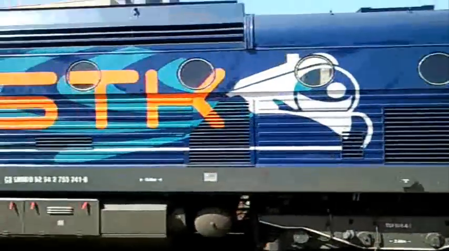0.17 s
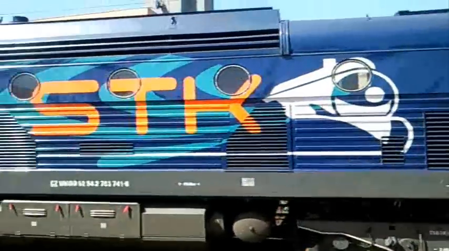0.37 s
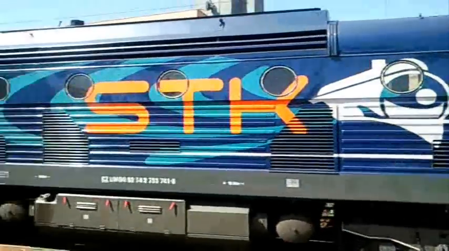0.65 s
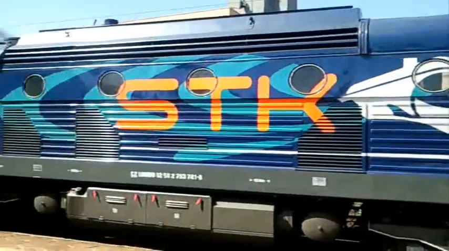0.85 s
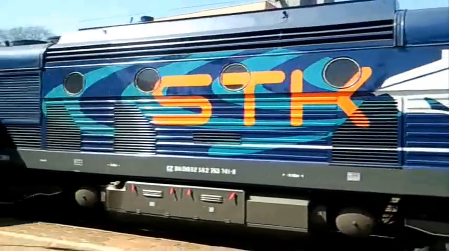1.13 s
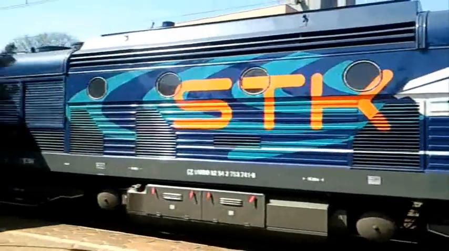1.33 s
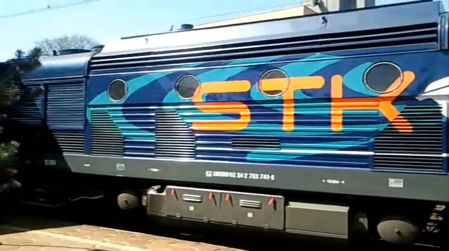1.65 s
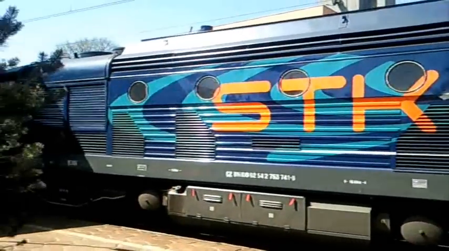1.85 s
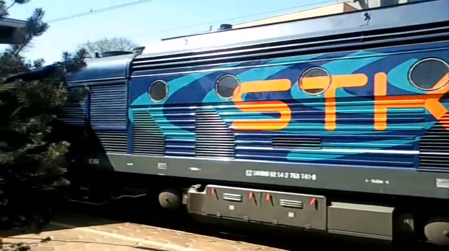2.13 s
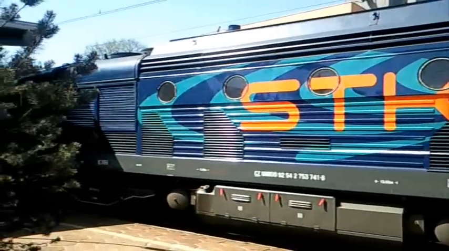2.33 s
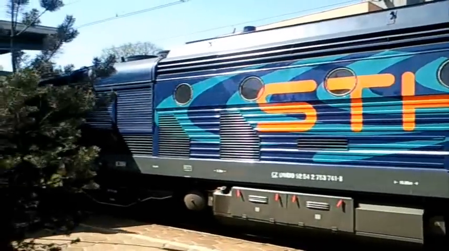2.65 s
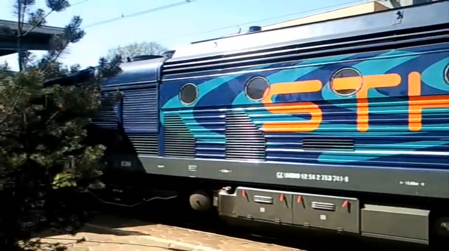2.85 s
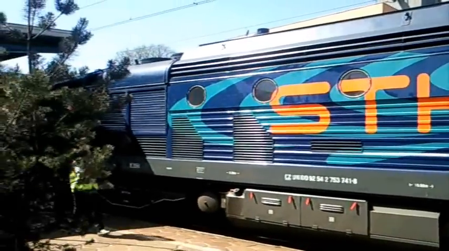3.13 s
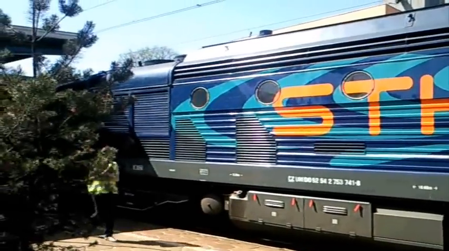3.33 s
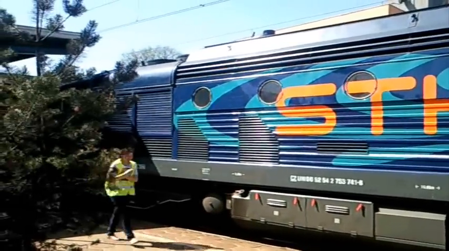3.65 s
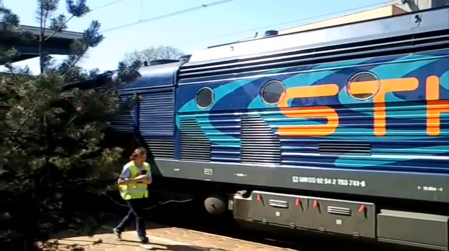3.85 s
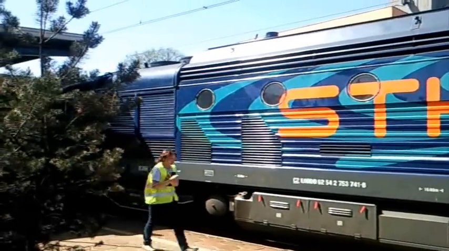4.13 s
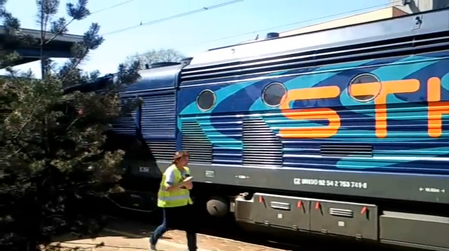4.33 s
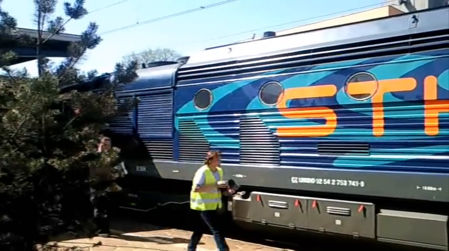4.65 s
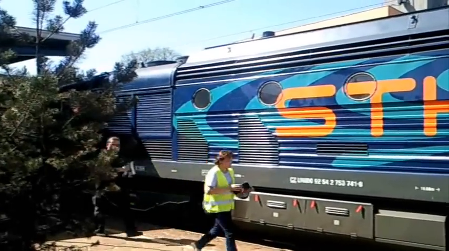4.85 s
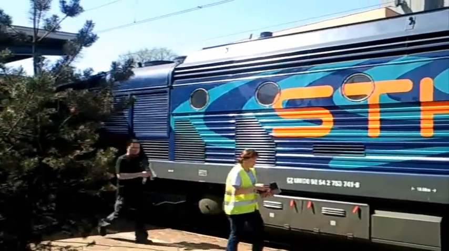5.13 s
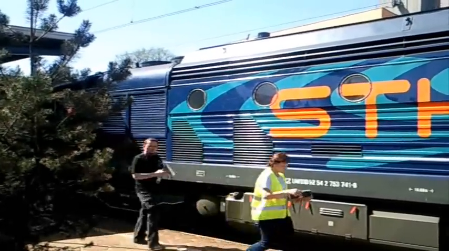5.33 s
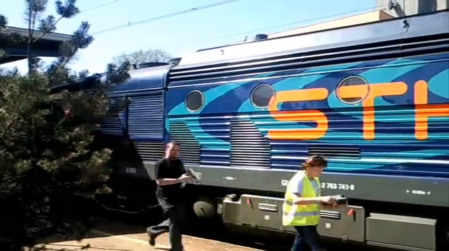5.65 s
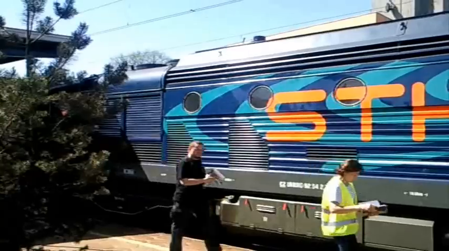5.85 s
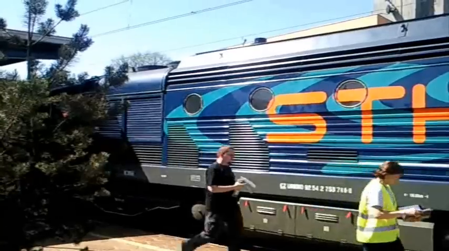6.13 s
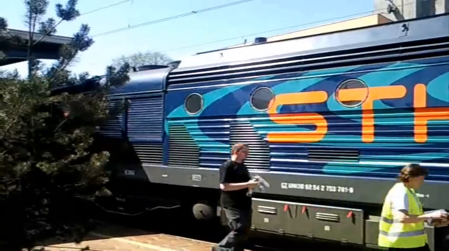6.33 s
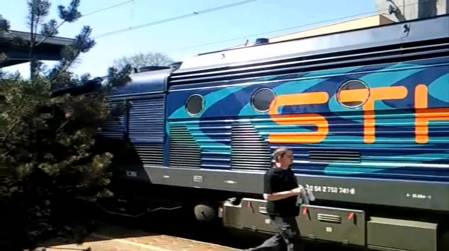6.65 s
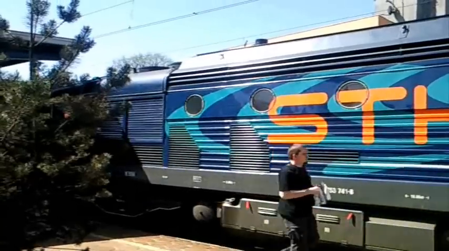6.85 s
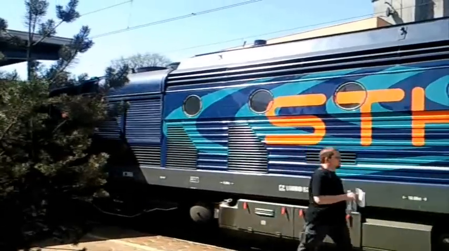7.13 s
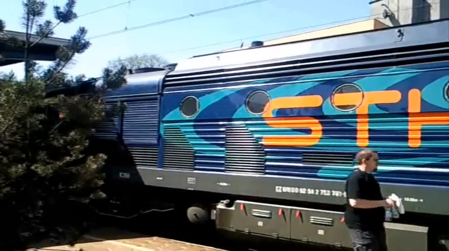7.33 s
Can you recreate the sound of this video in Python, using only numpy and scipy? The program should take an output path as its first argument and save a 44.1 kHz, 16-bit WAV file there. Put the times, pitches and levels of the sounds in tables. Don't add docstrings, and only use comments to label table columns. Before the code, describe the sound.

A small unprotected microphone on an open platform catches violent wind rumble and snapping thumps over a locomotive's constant ventilation roar. An early brake shoe squeaks faintly, then longer. After about three seconds the gusts thin out, revealing the pulsing hum and whine. Around the middle there are a soft chirp, a quick air hiss and a brighter chirp; a few light gusts return at the end.

```python
import sys
import numpy as np
from scipy import signal
from scipy.fft import rfft, irfft
from scipy.io import wavfile
from scipy.ndimage import uniform_filter1d, minimum_filter1d

SR = 44100
rng = np.random.default_rng(int(sys.argv[2]) if len(sys.argv) > 2 else 0)


def wav_record(signal):
    frames = np.transpose(np.atleast_2d(signal))
    bounded = np.clip(frames, -1, 1)
    quanta = np.round(bounded * 32767).astype(np.int16)
    wavfile.write(sys.argv[1], SR, quanta)


N = 329868


def from_db(db):
    return 10 ** (np.asarray(db) / 20)


def rms_one(x):
    return x / np.sqrt(np.mean(x ** 2) + 1e-20)


def in_time(rows):
    s, db = np.transpose(rows)
    return np.interp(np.arange(N) / SR, s, db)


def drift(rate):
    r = np.exp(-40 * np.pi * rate / SR)
    noise = rng.standard_normal(N // 20 + 4002)
    slow = signal.lfilter([1], [1, -2 * r, r * r], noise)[4000:]
    return np.interp(np.arange(N) / 20, np.arange(len(slow)), rms_one(slow - slow.mean()))


def coloured(spectrum):
    hz, db = np.transpose(spectrum)
    log_hz = np.log(np.fft.rfftfreq(N, 1 / SR) + 1)
    corners = np.log(np.r_[hz[0] / 3, hz, hz[-1] * 1.1])
    shape = np.interp(log_hz, corners, np.r_[db[0] - 20, db, db[-1] - 40])
    return rms_one(irfft(rfft(rng.standard_normal(N)) * from_db(shape), N))


def band(x, low_hz, high_hz):
    return signal.sosfilt(signal.butter(2, [low_hz, high_hz], "band", fs=SR, output="sos"), x)


def whistle(hz, width_hz):
    r = np.exp(-np.pi * width_hz / SR)
    poles = [1, -2 * r * np.cos(2 * np.pi * hz / SR), r * r]
    tone = signal.lfilter([1, 0, -1], poles, rng.standard_normal(N + SR))
    return rms_one(tone[SR:])


def sine(hz, wander_hz):
    return np.sqrt(2) * np.sin(2 * np.pi * np.cumsum(hz + wander_hz * drift(1.6)) / SR)


def swell_of(start, length, late, power):
    done = np.clip((np.arange(N) / SR - start) / length, 0, 1)
    return np.abs(np.sin(np.pi * done ** late)) ** power


# frequency in Hz, density in dB per Hz.
ROAR_SPECTRUM = [(30, -13), (90, -8.5), (170, -13.5), (340, -11), (500, -11.5), (655, -18), (900, -15.5),
                 (1080, -19), (1500, -18), (2550, -15), (3000, -26), (5200, -28), (6800, -33), (8000, -28)]
# time in seconds, level in dB.
ROAR_LEVEL = [(0.0, -25.5), (0.69, -26), (1.39, -27.5), (1.77, -26.5), (3.35, -27.5), (3.75, -27),
              (4.3, -29), (7.19, -27.5), (7.48, -26.5)]
# pitch in Hz, width in Hz, level in dB.
DUCT_WHISTLES = [(164, 21, -36), (255.2, 2.8, -40), (754, 9, -41.5), (1334, 100, -38.5), (1501, 14, -47),
                 (1881, 24, -42.5), (2473, 29, -44), (3550, 17, -64.5), (4080, 10, -59.5)]


def blowers():
    roar = coloured(ROAR_SPECTRUM)
    top = band(roar, 1100, 16000)
    roar = roar / np.std(band(roar, 1100, 3130))
    top = top / np.std(band(coloured(ROAR_SPECTRUM), 1000, 2300))
    roar = roar * from_db(0.91 * drift(1.5)) + top * (from_db(0.6 * drift(11)) - 1)
    whistles = sum(from_db(db) * whistle(hz, width_hz) for hz, width_hz, db in DUCT_WHISTLES)
    return from_db(in_time(ROAR_LEVEL) - 1.04) * roar + whistles


BLADE_HZ, BLADE_WIDTH_HZ = 279.45, 14
BEAT_HZ, IN_STEP_S = 3.005, 0.08
FIRST_BLADE_DB, SECOND_BLADE_DB, BLADE_BREATH_DB, GEAR_DB = -34, -39, -36, -38
GEAR_HZ, SHAFT_HZ, SHAFT_SWING = 919.8, 15.9, 0.73
MOTOR_HZ = 6009
# time in seconds, level in dB.
MOTOR_LEVEL = [(0, -52.5), (2.4, -54.5), (3, -56.5), (7.48, -63.5)]


def hum():
    since = np.arange(N) / SR - IN_STEP_S
    angle = 2 * np.pi * np.cumsum(BLADE_HZ + 0.22 * drift(2.0)) / SR
    first = from_db(FIRST_BLADE_DB) * np.sin(angle)
    second = from_db(SECOND_BLADE_DB) * np.sin(angle + 2 * np.pi * BEAT_HZ * since)
    blade = np.sqrt(2) * (first + second) * from_db(1.4 * drift(3.8))
    breath = from_db(BLADE_BREATH_DB) * whistle(BLADE_HZ, BLADE_WIDTH_HZ)
    turn = 1 + SHAFT_SWING * sine(SHAFT_HZ, wander_hz=0.94) / np.sqrt(2)
    gear = sine(GEAR_HZ, wander_hz=0.4) * turn * from_db(GEAR_DB + 1.3 * drift(5.9))
    motor = from_db(in_time(MOTOR_LEVEL) + 1.5 * drift(2.6)) * sine(MOTOR_HZ, wander_hz=4.3)
    return blade + breath + gear + motor


BREEZE_BRIGHT_DB = -7
# time in seconds, level in dB.
BREEZE_LEVEL = [(0, -21.5), (.65, -18), (1.15, -22.5), (1.48, -33), (1.58, -16.5), (2.2, -14.5), (2.5, -19),
                (2.66, -29), (2.85, -18.5), (3.0, -33), (3.35, -27.5), (4.0, -34.5), (4.6, -29),
                (5.1, -27.5), (6.0, -33.5), (6.7, -41.5), (7.48, -26.5)]
# centre in seconds, length in seconds, level in dB,
# brightness of the upper rumble in dB.
GUST_EVENTS = [(.005, 0.21, -18.5, -0.5), (0.134, 0.069, -21, 7.5), (0.202, 0.07, -21, 3),
               (0.365, .1, -12.5, 0), (0.533, .05, -22, -5), (0.593, 0.082, -16, -11),
               (0.714, 0.052, -24, -11), (0.839, 0.073, -18, 1.5), (0.91, 0.045, -17, -15),
               (1.222, 0.2, -22, -17), (1.372, 0.15, -20.5, -10.5), (1.568, .06, -16.5, -7.5),
               (1.676, 0.13, -13.5, -3.5), (1.776, 0.072, -24.5, -15), (1.883, .08, -19, 1),
               (1.995, 0.2, -12, -1), (2.091, .08, -18, 3), (2.282, 0.12, -12, 3.5),
               (2.383, 0.052, -17, -8.5), (2.448, 0.04, -15.5, -8), (2.587, 0.11, -16.5, -2),
               (2.742, .11, -14.5, -1.5), (2.92, 0.053, -27, -20), (3.256, 0.051, -20.5, -7),
               (3.42, .15, -19.5, -13), (3.72, 0.36, -27.5, -11), (4.835, 0.11, -20.5, -24),
               (6.86, 0.062, -19.5, -22), (7.02, 0.33, -26.5, -16), (7.36, 0.05, -21, -4)]


def airflow():
    low = from_db(in_time(BREEZE_LEVEL))
    high = low * from_db(BREEZE_BRIGHT_DB)
    for centre, length, db, bright_db in GUST_EVENTS:
        gust = from_db(db) * swell_of(centre - length / 2, length, late=0.81, power=1.45)
        low = low + gust
        high = high + gust * from_db(bright_db)
    return low, high


# frequency in Hz, density in dB per Hz.
RUMBLE_SPECTRUM = [(22, -18), (60, 0.5), (150, 1), (300, 0.5), (500, -6), (700, -13.5), (1100, -26),
                   (1500, -25.5), (2200, -57)]


def wind(low_flow, high_flow):
    rumble = coloured(RUMBLE_SPECTRUM)
    rumble = rumble / np.std(band(rumble, 33, 272))
    low = signal.sosfilt(signal.butter(2, 300, fs=SR, output="sos"), rumble)
    lumps = drift(53)
    low_gain = from_db(1.7 * lumps + 0.37 * drift(31) - 3.5)
    high_gain = from_db(3.1 * lumps + 1.9 * drift(45) - 1.5)
    return low_flow * low * low_gain + high_flow * (rumble - low) * high_gain


SMALL_PER_S, SMALL_LOW_HZ, SMALL_HIGH_HZ = 14, 102, 330
SMALL_OVER_WIND_DB, SMALL_SCATTER_DB = 7, 4


def small_eddies(flow):
    count = int(SMALL_PER_S * N / SR)
    place, pitch, size = rng.random((count, 3)).T
    s = (np.arange(count) + place) / SMALL_PER_S
    wind_db = 20 * np.log10(flow[(s * SR).astype(int)])
    db = wind_db + SMALL_OVER_WIND_DB + SMALL_SCATTER_DB * (2 * size - 1)
    return list(zip(s, db, SMALL_LOW_HZ * (SMALL_HIGH_HZ / SMALL_LOW_HZ) ** pitch))


FLUTTER_S = 0.025
# start in seconds, peak in dB, pitch in Hz.
STRONG_EDDIES = [(.028, -7, 393), (.109, -2, 101), (.19, -19, 390), (.253, -1, 194), (.336, -13, 306),
                 (.35, -3, 91), (.518, -3, 147), (.61, -3, 345), (.648, -0.5, 253), (.736, -7, 99.6),
                 (.822, -4, 260), (1.229, -1, 133), (1.552, -2, 103.6), (1.618, -9, 155), (1.675, 3.5, 262),
                 (1.721, -7, 360), (1.953, 1.5, 160), (1.978, -4.5, 169), (2.042, -6, 122),
                 (2.096, -3.5, 416), (2.247, 3, 284), (2.299, 0.5, 574), (2.314, 3.5, 184),
                 (2.389, -2.5, 218), (2.73, 1.5, 277), (3.485, -6, 174), (3.66, -14, 92), (4.85, -7.5, 119),
                 (6.847, -13, 156), (6.984, -11, 164)]


def puffs(flow):
    eddies = list(STRONG_EDDIES) + small_eddies(flow)
    out = np.zeros(N + SR)
    white = rng.standard_normal((len(eddies), SR // 8))
    phases = rng.uniform(0, 2 * np.pi, len(eddies))
    swell = np.sin(np.pi * np.linspace(0, 1, int(FLUTTER_S * SR)) ** 0.45)
    for (s, db, hz), noise, phase in zip(eddies, white, phases):
        at = round(s * SR)
        t = np.arange(int(1.7 * SR / hz)) / SR
        push = np.abs(np.sin(np.pi * (t / t[-1]) ** 0.65)) * np.sin(2 * np.pi * hz * t + phase)
        out[at:at + len(t)] += from_db(db - 7) * push
        flutter = rms_one(band(noise, hz * 0.45, hz * 2.12)[-len(swell):])
        out[at:at + len(swell)] += from_db(db - 15) * swell * flutter
    return out[:N]


# time in seconds, peak in dB, pitch in Hz.
DIAPHRAGM_SNAPS = [(.008, -7, 298), (0.3342, 0, 300), (1.765, -6.5, 400), (1.7924, -1.5, 330),
                   (1.8686, -2, 420), (1.95, 2.5, 262), (2.012, 3, 330), (2.243, 3, 260), (2.375, -9, 300)]


def snaps():
    out = np.zeros(N)
    around = np.arange(-300, 300)
    signs = rng.choice([-1, 1], len(DIAPHRAGM_SNAPS))
    for (s, db, hz), sign in zip(DIAPHRAGM_SNAPS, signs):
        cycles = around / SR * hz
        flip = np.tanh(cycles / 0.06) * np.exp(-(cycles / 0.39) ** 2)
        out[round(s * SR) + around] += sign * from_db(db) * flip
    return out


SQUEAK_HZ = 4700
GRIP_LATE, GRIP_ROUND = 1.1, 1.1
# start in seconds, length in seconds, level in dB.
BRAKE_GRIPS = [
    (0.444, .065, -46),
    (.54, .15, -39),
    (0.677, 0.39, -32),
]
# start in seconds, length in seconds, pitch in Hz, glide in Hz, level in dB.
METAL_CHIRPS = [
    (3.555, .135, 996, 0, -33),
    (4.198, .05, 2440, 170, -26.5),
]


def squeaks():
    grip = sum(from_db(db) * swell_of(start, length, GRIP_LATE, GRIP_ROUND)
               for start, length, db in BRAKE_GRIPS)
    out = grip * from_db(1.7 * drift(30)) * sine(SQUEAK_HZ, wander_hz=3)
    t = np.arange(N) / SR
    for start, length, hz, glide_hz, db in METAL_CHIRPS:
        done = np.clip((t - start) / length, 0, 1)
        swell = np.sin(np.pi * done ** 0.7) ** 0.7
        tone = sine(hz + glide_hz * (1 - np.exp(-5 * done)), wander_hz=5)
        out = out + from_db(db + 3 * drift(70)) * swell * tone
    return out


SPIT_S, LEAK_S = 3.818, 3.79
SPIT_DB, LEAK_DB, SPIT_SAG_DB_PER_S = -28, -36, 10
SPIT_ATTACK_S, SPIT_LENGTH_S = 0.004, 0.18
# frequency in Hz, density in dB per Hz.
SPIT_SPECTRUM = [(600, -7), (1000, 3.5), (2000, 5.5), (3500, -2.5), (5500, -2.5), (7000, -0.5), (8300, 8.5)]


def valve():
    air = coloured(SPIT_SPECTRUM)
    since = np.maximum(np.arange(N) / SR - SPIT_S, 0)
    opening = 1 - np.exp(-since / SPIT_ATTACK_S)
    closing = np.clip(1 - since / SPIT_LENGTH_S, 0, 1) ** 0.65
    pressure = from_db(SPIT_DB - SPIT_SAG_DB_PER_S * since + 0.83 * drift(49))
    leak = from_db(LEAK_DB) * swell_of(LEAK_S, 0.05, late=1.1, power=0.8)
    return (opening * closing * pressure + leak) * air / np.std(band(air, 3000, 5900))


def scene():
    low_flow, high_flow = airflow()
    locomotive = blowers() + hum() + squeaks() + valve()
    gusts = wind(low_flow, high_flow) + puffs(low_flow) + snaps()
    return (locomotive + gusts)[None]


THIN_HZ, TOP_HZ, THIN_FRAME = 6790, 7960, 882


def thin_treble(x, keep=1.85, lift_db=4.5, halo_db=-3, mask_db=-16, starve_db=-46):
    hz, _, z = signal.stft(x, SR, "cosine", THIN_FRAME)
    size = np.abs(z)
    even = np.sqrt(np.abs(uniform_filter1d(size ** 2, size=7, axis=1)))
    louder_below = np.roll(-minimum_filter1d(-even, size=11, axis=0), 9, axis=0)
    hidden = (even < from_db(mask_db) * louder_below) & (hz[:, None] > 4300)
    loudness = uniform_filter1d(np.sqrt(np.sum(even ** 2, axis=0)), size=41)
    starved_band = (hz[:, None] > 4400) & (hz[:, None] < THIN_HZ)
    hidden |= (size < from_db(starve_db) * loudness) & starved_band
    z[hidden] = 0
    top = (hz > THIN_HZ) & (hz < TOP_HZ)
    flat = size[top] / np.median(size[top], axis=1, keepdims=True)
    step = keep * uniform_filter1d(np.sqrt(np.mean(flat ** 2, axis=0)), size=5)
    kept = flat > step * np.linspace(1.06, 0.88, len(flat))[:, None]
    halo = uniform_filter1d(uniform_filter1d(kept * 1.0, size=15, axis=1), size=2, axis=0)
    twinkle_gain = from_db(lift_db) * step / (flat + 1e-9)
    z[top] *= np.where(kept, twinkle_gain, from_db(halo_db) * np.sqrt(np.abs(halo)))
    z[hz >= TOP_HZ] = 0
    return signal.istft(z, SR, "cosine", THIN_FRAME)[1][:N]


FIRST_RATE_HZ = 16000
# low edge in Hz, high edge in Hz, height over the usual that is kept
# as a ratio, level in dB, memory in frames.
MIRROR_BANDS = [
    (9500, 9950, 2.15, -20, 3),
    (12100, 12800, 2.85, -21, 75),
]


def rate_images(x):
    mirror = x * np.cos(2 * np.pi * FIRST_RATE_HZ * np.arange(N) / SR)
    hz, _, z = signal.stft(mirror, SR, "hann", 4096)
    gain = np.zeros(z.shape)
    for low_hz, high_hz, keep, db, memory in MIRROR_BANDS:
        rows = (hz > low_hz) & (hz < high_hz)
        usual = uniform_filter1d(np.sqrt(np.mean(np.abs(z[rows]) ** 2, axis=0)), size=memory)
        gain[rows] = from_db(db) * (np.abs(z[rows]) > keep * usual)
    return signal.istft(z * gain, SR, "hann", 4096)[1][:N]


def roll_off(x):
    return signal.sosfilt(signal.butter(12, 12900, fs=SR, output="sos"), x)


def record(dry):
    rounded = 1.361 * np.tanh(dry[0] / 1.36)
    first = thin_treble(rounded)
    held = np.clip(first + rate_images(first), -1, 1)
    return roll_off(held[None])


dry = scene()
out = record(dry)
wav_record(out)
```